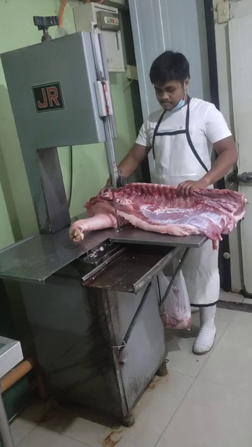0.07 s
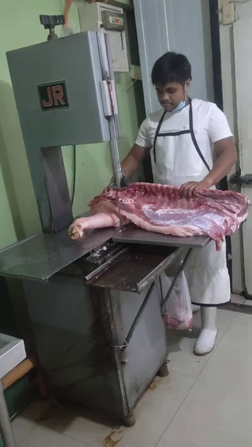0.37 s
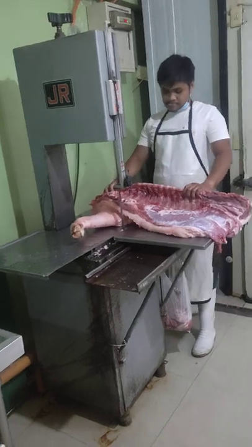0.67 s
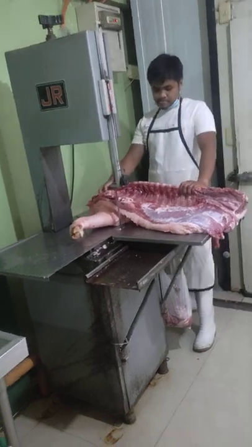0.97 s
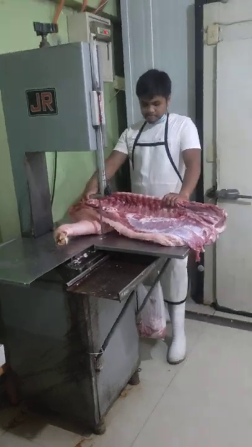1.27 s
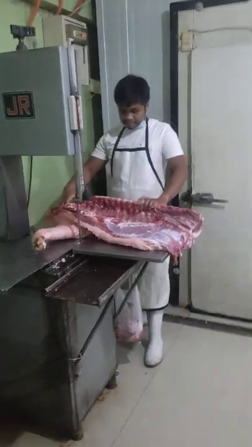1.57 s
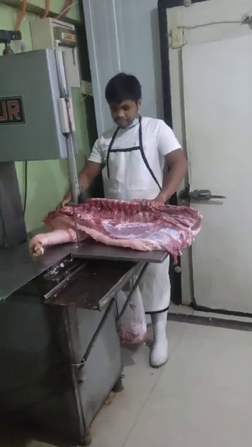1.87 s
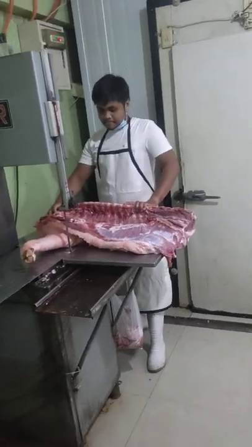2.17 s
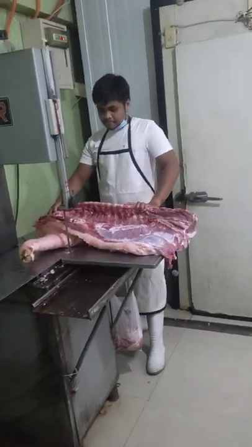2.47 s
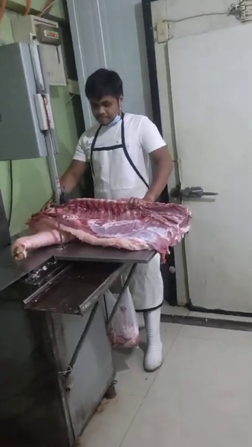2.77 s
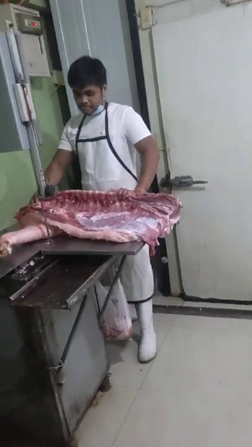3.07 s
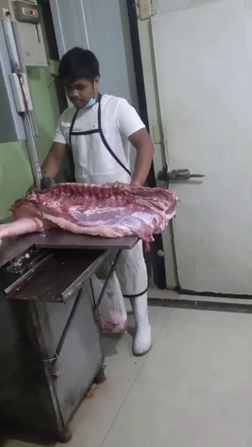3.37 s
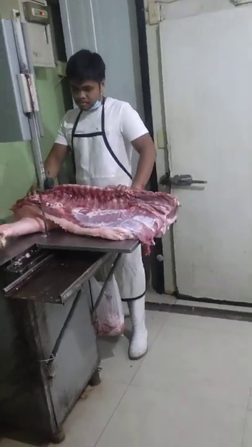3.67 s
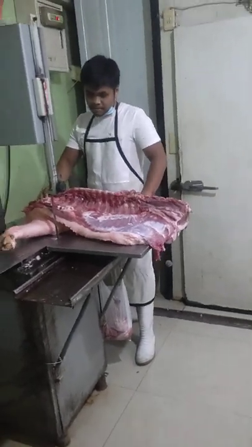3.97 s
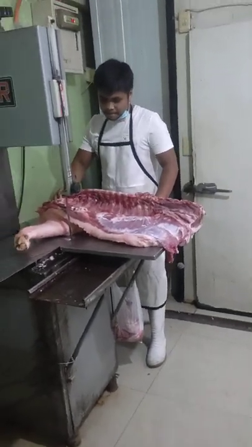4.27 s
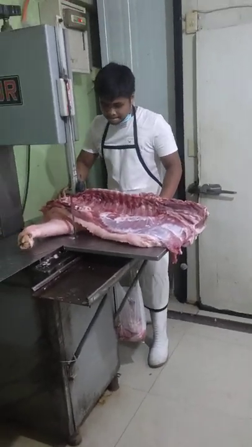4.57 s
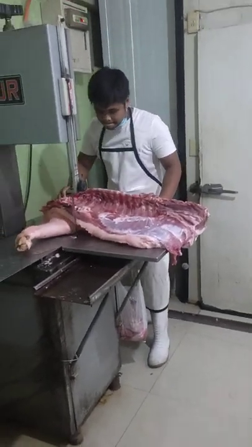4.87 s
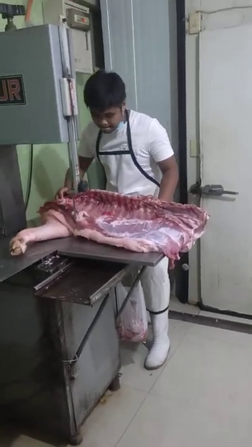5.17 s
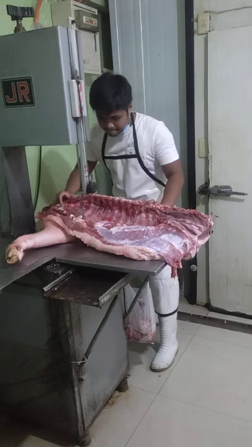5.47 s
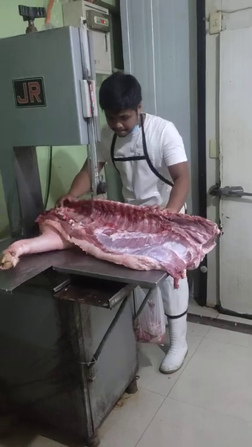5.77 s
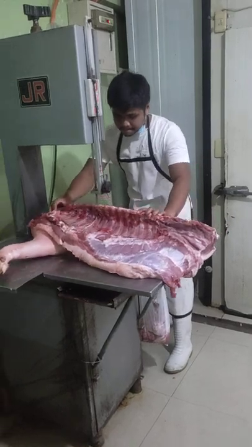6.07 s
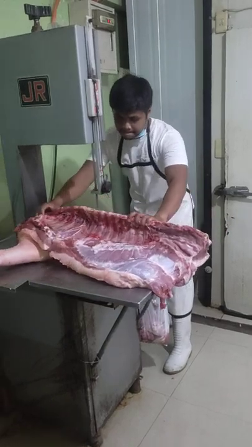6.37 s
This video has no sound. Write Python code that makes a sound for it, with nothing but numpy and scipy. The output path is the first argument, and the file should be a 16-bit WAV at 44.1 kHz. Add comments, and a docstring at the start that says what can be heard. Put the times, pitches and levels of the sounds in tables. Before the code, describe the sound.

A butcher's band saw runs free in a small tiled room, its motor humming, its steel cabinet droning and rattling, its blade hissing. A side of pork slides over the table with a few soft swishes and light knocks, and later one heavy bump. Near the end the blade bites into bone with a loud, rasping whine that squeals and sinks in pitch. The microphone is nearby.

```python
"""A butcher's band saw screams through bone: each tooth takes a chip, and the whine squeals and sinks
as the load drags the blade down. Before the cut the saw runs free in a small tiled room: the motor
hums, the steel cabinet drones and rattles, the blade hisses in its guides. A side of pork is pushed
along the table, with a few light knocks and one heavy bump, until it meets the blade."""
import sys
import numpy as np
from scipy import signal
from scipy.fft import rfft, irfft, next_fast_len
from scipy.io import wavfile
from scipy.ndimage import uniform_filter1d

SR = 44100
rng = np.random.default_rng(int(sys.argv[2]) if len(sys.argv) > 2 else 0)


def master(y):
    """Save y as 16-bit WAV."""
    cut = np.clip(np.atleast_2d(y).T, -1, 1)
    pcm = np.round(cut * 32767)  # scale
    wavfile.write(sys.argv[1], SR, pcm.astype(np.int16))


N = 282681
TIME = np.arange(N) / SR
CUT_S, FULL_LOAD_S = 5.17, 6.41  # the teeth meet the bone and sink in at an even pace

# colour of the blade's hiss: f/Hz, level/dB
HISS = [(2500, -13), (3600, -12), (4600, -13), (5500, -4), (6200, -1.5), (7000, 1.5), (7600, 0)]


def from_db(db):
    """Decibels to gain."""
    return 10 ** (np.asarray(db) / 20)


def rms_one(x):
    """Scale to unit power."""
    return x / np.sqrt(np.mean(x ** 2) + 1e-20)


def evened(x, size=2600):
    """Hold the short-term power at 1."""
    return x / np.sqrt(uniform_filter1d(x * x, size) + 1e-9)


def drift(rate_hz):
    """Smooth random wander of unit power."""
    step, settle = 40, 2000
    pole = np.exp(-2 * np.pi * rate_hz * step / SR)
    white = rng.standard_normal(N // step + settle + 2)
    slow = signal.lfilter([1], [1, -2 * pole, pole * pole], white)[settle:]
    return np.interp(np.arange(N) / step, np.arange(len(slow)), rms_one(slow))


def turning(hz):
    """Phase of a cycle whose rate changes."""
    return 2 * np.pi * (np.cumsum(hz) / SR + rng.random())


def noise(colour):
    """Unit-power noise of the given colour, falling steeply beyond its ends."""
    size = next_fast_len(N, real=True)
    freqs = np.maximum(np.arange(size // 2 + 1) * SR / size, 1)
    hz, db = np.transpose(colour)
    beyond = np.maximum(1, np.maximum(hz[0] / freqs, freqs / hz[-1]))
    gain = from_db(np.interp(np.log(freqs), np.log(hz), db)) / beyond ** 4
    return rms_one(irfft(rfft(rng.standard_normal(size)) * gain, size)[:N])


def shaken(modes):
    """Steel shaken at random: the wider a mode, the faster it swells and fades."""
    out = np.zeros(N)
    for hz, width, db in modes:
        phase = 2 * np.pi * hz * TIME
        out += from_db(db) * (drift(width / 2) * np.cos(phase) + drift(width / 2) * np.sin(phase))
    return out


def swishes(rows):
    """Envelope of short rubs that swell quickly and die away."""
    out = np.zeros(N)
    for start, db, decay in rows:
        age = np.maximum(TIME - start, 0) / decay
        out += from_db(db) * 2 * (1 - np.exp(-np.pi * age)) * np.exp(-age)
    return out


def swells(rows):
    """Sum of bell-shaped swells; a length is the width at half height."""
    return sum(height * 0.5 ** ((2 * (TIME - peak) / length) ** 2) for peak, length, height in rows)


def ramp(start_s, length_s):
    """Rise evenly from 0 to 1, then hold."""
    return np.clip((TIME - start_s) / length_s, 0, 1)


def load():
    """How deep the blade is in the bone, 0-1."""
    return ramp(CUT_S, FULL_LOAD_S - CUT_S)


def machine_level(ride):
    """Level ride in dB: a part of the machine builds up, holds, then takes the load."""
    start_db, build_db, from_s, over_s, load_db = ride
    return start_db + build_db * ramp(from_s, over_s) + load_db * load()


def cut_level(ride):
    """Level ride in dB: a part of the cut shifts as the blade binds, takes the load and squeals."""
    # the blade catches and squeals: peak t/s, length/s, strength/0-1
    squeals = [(5.33, .15, 0.2), (5.715, 0.12, 1.0), (5.875, 0.12, 0.9), (6.31, .08, .65),
               (6.41, 0.065, 0.5)]
    touch_db, bind_db, load_db, squeal_db = ride
    binding = ramp(start_s=5.43, length_s=0.052)
    return touch_db + bind_db * binding + load_db * load() + squeal_db * swells(squeals)


def room(x, wet_db, t60_s=0.44):
    """Direct sound plus dense reflections from the tiles."""
    t = np.arange(SR // 2) / SR
    tail = rng.standard_normal(len(t)) * from_db(-60 * t / t60_s) * (t > .004)
    wet = from_db(wet_db)
    return (x + wet * signal.fftconvolve(x, tail / np.linalg.norm(tail))[:N]) / np.hypot(1, wet)


def motor(hum_hz, waver_db):
    """The motor hums at twice the mains rate; the belt adds tones that waver a little."""
    # level ride of the hum: t/s, level/dB
    hum_ride = [(0, -36), (.15, -23.5), (.9, -27), (2.6, -26.5), (3.35, -20), (3.95, -21), (4.3, -19),
                (5.2, -25.5), (5.55, -37), (6.15, -27), (6.41, -44)]
    # pulley and belt tones: f/Hz, level/dB, wander/Hz
    belt_tones = [(57.6, -52, 2), (88.7, -37.5, 1.4), (131.3, -33, 4)]
    hum_db = np.interp(TIME, *np.transpose(hum_ride)) - 1.8
    hum = from_db(hum_db + waver_db * drift(1.7)) * np.sin(turning(hum_hz + 0.47 * drift(4)))
    belt = sum(from_db(db + 2.7 * drift(6.8)) * np.sin(turning(hz + wander * drift(4)))
               for hz, db, wander in belt_tones)
    return np.sqrt(2) * (hum + belt)


def cabinet_rumble():
    """The drive shakes the housing; the low end swells as the carcass is shoved along."""
    # rumble colour: f/Hz, level/dB
    colour = [(25, -47.5), (45, -32), (62, -10.5), (105, -8.5), (142, 2), (180, -1.5), (215, -2),
              (320, -4.5), (470, -8.5), (540, -16.5), (900, -40.5)]
    # level ride: start/dB, build/dB, from t/s, over/s, load/dB
    ride = (-27.5, 1.5, 1.0, 1, -6.5)
    # shoves: peak t/s, length/s, boost/dB
    shoves = [(.56, 0.089, 4.5), (1.27, 0.2, 2.5), (5.38, 0.14, 1.5)]
    return from_db(machine_level(ride) + swells(shoves) - 0.9) * noise(colour)


def cabinet_drone(drive_hz, unpushed_db):
    """The cabinet rings and carries a tone of the drive, more softly until the first push."""
    # cabinet modes: f/Hz, width/Hz, level/dB
    modes = [(260.7, 12, -16.5), (292.2, 7.1, -6), (333, 3.7, -17.5), (350, 12, -8.5), (396.6, 10.4, -4),
             (417.3, 9.9, -4), (431, 8.4, -7.5), (466.7, 16, -8.5)]
    # level ride: start/dB, build/dB, from t/s, over/s, load/dB
    ride = (-31.5, 7.5, 0.5, 3, -7.5)
    # the drone swells: peak t/s, length/s, boost/dB
    surges = [(.62, 0.26, 6), (1.2, .15, 3.5), (2.1, 0.23, 6), (3.0, 0.26, 6), (5.38, 0.15, 5.5),
              (6.0, 0.1, 7.5)]
    pushed = ramp(start_s=0.45, length_s=0.077)
    level_db = machine_level(ride) + swells(surges) + unpushed_db * (1 - pushed) - 1.5
    drive_gain = np.sqrt(2) * from_db(-5 + 0.25 * drift(8.6))
    drive = drive_gain * np.sin(turning(drive_hz + 2.0 * drift(5.2)))
    return from_db(level_db) * (drive + from_db(-2.0) * shaken(modes))


def panel_rattle():
    """Shaken by the drive, the table and covers rattle and ring."""
    # panel modes: f/Hz, width/Hz, level/dB
    modes = [(573, 20, -9), (598, 6, -12), (678.3, 6.6, -11), (732, 34, -15.5), (747, 4.9, -9.5),
             (769.4, 7.2, -17.5), (804, 6.1, -15), (851, 33, -18.5), (837.5, 16, -12.5)]
    # rattle colour: f/Hz, level/dB
    colour = [(300, -20), (480, 0.5), (580, -2.5), (720, 0.5), (860, -1), (1000, -11.5), (1300, -11.5),
              (2500, -42)]
    # rides of the layer and of its ring-to-noise balance: start/dB, build/dB, from t/s, over/s, load/dB
    ride = (-36.5, 15, -0.3, 4.5, -10.5)
    ring_ride = (-5, 7, 2.5, 2.5, -2)
    ring = from_db(machine_level(ring_ride))
    rattle = (ring * rms_one(shaken(modes)) + noise(colour)) / np.hypot(1, ring)
    return from_db(machine_level(ride) - 0.17) * rattle


def wheel_throb(wheel_hz, once, twice):
    """Tremolo: the blade tightens and slackens with each turn of its wheels."""
    turn = turning(wheel_hz * (1 + 0.033 * drift(1.5)))
    return 1 + once * np.sin(turn) + twice * np.sin(2 * turn)


def table_bumps(contact_hz):
    """Soft blows from the heavy carcass set the steel table booming."""
    # bumps: t/s, level/dB
    bumps = [(.185, -19), (.43, -26), (0.714, -14), (3.625, -3), (3.643, -14)]
    # low table modes: f/Hz, level/dB, t60/s
    modes = [(148.5, -3.5, 0.12), (172.6, -5, 0.19), (261, -4.5, 0.088)]
    blows, boom = np.zeros(N), np.zeros(N)
    for start, db in bumps:
        blows[int(start * SR)] = from_db(db)
    blows = signal.sosfilt(signal.butter(3, contact_hz, fs=SR, output="sos"), blows + 1e-18)
    for hz, db, t60 in modes:
        radius, angle = from_db(-60 / (t60 * SR)), 2 * np.pi * hz / SR
        boom += from_db(db) * signal.lfilter([1, -1], [1, -2 * radius * np.cos(angle), radius ** 2], blows)
    return room(boom, wet_db=0) * from_db(2.0)


def meat_scuffs():
    """Meat slides over the steel in short, bright swishes."""
    # scuffs: t/s, level/dB, decay/s
    scuffs = [(.17, -45.5, 0.078), (.32, -51.5, 0.08), (.51, -50.5, 0.063), (.68, -46.5, .07)]
    # scuff colour: f/Hz, level/dB
    colour = [(1500, -10), (3000, 6), (4600, 1), (5800, 0.5), (7500, -10.5)]
    return swishes(scuffs) * noise(colour)


def running_blade(flicker_db):
    """The steel band rubs and hisses through its guides and sings near its free-running tooth rate."""
    # rub colour: f/Hz, level/dB
    rub_colour = [(600, -16.5), (950, -2), (1180, -3.5), (1340, -4.5), (1560, -5), (1950, -9), (2200, -5.5),
                  (2430, -9.5), (2650, -11.5), (2850, -15.5), (3400, -20), (4200, -23), (7500, -33.5)]
    # modes of the guard and guides, and of the blade: f/Hz, width/Hz, level/dB
    guide_modes = [(955, 62, -9), (1095, 35, -12), (1208, 27, -14.5), (1436, 23, -16.5), (1503, 70, -15),
                   (1608, 11, -14.5), (1639, 16, -16), (1784, 26, -17.5), (1952, 97, -18.5),
                   (2760, 24, -24), (3160, 76, -26)]
    blade_modes = [(2362, 48, -6), (2355, 25, -9), (2447, 35, -6), (2580, 26, -12)]
    # level rides: start/dB, build/dB, from t/s, over/s, load/dB
    rub_ride = (-36, 5.5, 0.7, 3, 0.5)
    sing_ride = (-46, 7.5, 2.2, 2.5, 0.5)
    hiss_ride = (-49.5, 11.5, 0.52, 3.5, 8.5)
    # the singing swells: peak t/s, length/s, boost/dB
    sing_swells = [(2.4, 0.18, 5), (4.12, .4, 6.5)]
    # short swishes in the hiss, the first two while the meat slides along the table: t/s, level/dB, decay/s
    brushes = [(.18, -60.5, 0.035), (.32, -50.5, 0.038), (1.108, -44.5, 0.03), (1.138, -55, 0.036)]
    rub_gain = from_db(machine_level(rub_ride) + flicker_db * drift(9.9))
    rub = rub_gain * (from_db(-0.9) * noise(rub_colour) + shaken(guide_modes))
    singing = from_db(machine_level(sing_ride) + swells(sing_swells) - 1.0) * shaken(blade_modes)
    hiss_gain = from_db(machine_level(hiss_ride) + 0.2 + flicker_db * drift(20)) + swishes(brushes)
    return rub + singing + hiss_gain * noise(HISS)


def whine(tooth_phase, chatter_db, scatter_hz):
    """Partials of the tooth rate; chips of uneven size spread a rough skirt around each."""
    # partials, the halves from teeth set left and right in turn: multiple of the tooth rate, level/dB
    partials = [(.5, -13), (1, 1.5), (1.5, -17), (2, -10), (2.5, -33), (3, -11), (4, -25.5), (5, -21.5)]
    # level rides: first touch/dB, bind/dB, load/dB, squeal/dB
    rough_ride = (0, 0.5, -1.5, -10.5)  # noisy skirts
    strain_ride = (-11, 13, 1, -8.5)  # half and even partials
    screech_ride = (4, 6.5, -17, -6.5)  # odd overtones
    rough = from_db(cut_level(rough_ride))
    strain_db, screech_db = cut_level(strain_ride), cut_level(screech_ride)
    out = np.zeros(N)
    for order, db in partials:
        phase = order * tooth_phase + 2 * np.pi * rng.random()
        skirt = (drift(scatter_hz) * np.cos(phase) + drift(scatter_hz) * np.sin(phase)) / np.sqrt(2)
        extra_db = screech_db * (order > 1) if order % 2 == 1 else strain_db
        out += from_db(db + extra_db + chatter_db * drift(32)) * (np.sin(phase) + rough * skirt)
    return out / np.hypot(1, rough)


def bone_cut(free_tooth_hz, sag_hz, jitter, sway, grit_db, bite):
    """Each tooth takes a chip of bone: a sinking whine, with rasp and spray pulsing at the tooth rate."""
    # rasp colour: f/Hz, level/dB
    rasp_colour = [(500, -14), (1000, 7.5), (1600, 8), (2300, 15.5), (2750, 2.5), (3250, 3.5), (3700, 0),
                   (4600, 3.5), (6000, -11.5), (7600, -16)]
    # level rides: first touch/dB, bind/dB, load/dB, squeal/dB
    whine_ride = (-21, -1.5, 2.5, 7)
    rasp_ride = (-35.5, -1, 6, -6.5)
    spray_ride = (-26, -4, 7, -5)
    # hissing bursts of flung chips: peak t/s, length/s, boost/dB
    bursts = [(5.54, 0.12, 0.5), (6.23, .12, 3.5)]
    attack_s, flesh_lead_s = 0.13, 0.071  # parting flesh hisses just ahead of the bone
    in_bone, in_flesh = ramp(CUT_S, attack_s), ramp(CUT_S - flesh_lead_s, attack_s)
    tooth_hz = free_tooth_hz - sag_hz * load() ** 2.2
    tooth_phase = turning(tooth_hz * (1 + jitter * drift(244) + sway * drift(25)))
    # the room still rings with the higher pitch of a moment ago, and beats against the sinking whine
    beating = room(whine(tooth_phase, chatter_db=1.5, scatter_hz=140), wet_db=-3.5)
    scream = from_db(cut_level(whine_ride) + 0.5) * evened(beating)
    chips = rms_one((1 + bite * np.cos(tooth_phase)) * from_db(grit_db * drift(40)))
    rasp = from_db(cut_level(rasp_ride) + 7.5) * noise(rasp_colour)
    spray = from_db(cut_level(spray_ride) - 3.0 + swells(bursts)) * noise(HISS)
    return in_bone * (scream + chips * rasp) + in_flesh * chips * spray


def scene():
    """The running machine, the handling of the carcass and the cut, in mono."""
    housing = cabinet_rumble() + cabinet_drone(drive_hz=389.4, unpushed_db=-10.5) + panel_rattle()
    housing *= wheel_throb(wheel_hz=12.7, once=0.063, twice=0.062)
    handling = table_bumps(contact_hz=210) + meat_scuffs()
    cut = bone_cut(free_tooth_hz=2392, sag_hz=999.6, jitter=0.009, sway=.006, grit_db=0.95, bite=0.14)
    hum = motor(hum_hz=120.4, waver_db=0.45)
    return (hum + housing + running_blade(flicker_db=.5) + handling + cut)[None]


def record(dry):
    """The lower treble is scooped hollow, the band above it lifted, and the top cut steeply."""
    cutoff_hz = 7620
    size = next_fast_len(N + SR, real=True)
    freqs = np.arange(size // 2 + 1) * SR / size
    hollow_db = np.interp(freqs, [3515, 3516, 5845, 5846], [0, -5.4, -3.0, 2.5])
    top = np.clip((cutoff_hz - freqs) / 110, 0, 1)
    return irfft(rfft(dry, size) * from_db(hollow_db) * top, size)[:, :N]


dry = scene()
out = record(dry)
master(out)
```